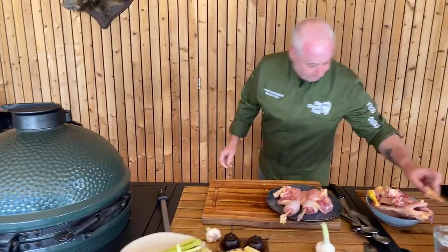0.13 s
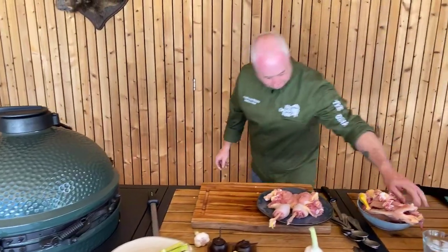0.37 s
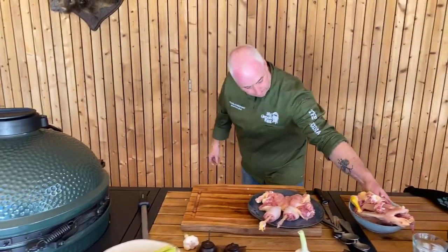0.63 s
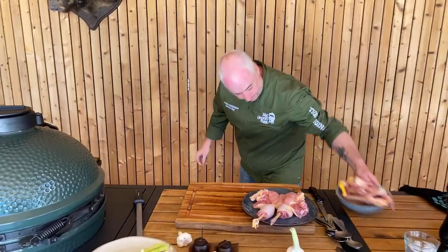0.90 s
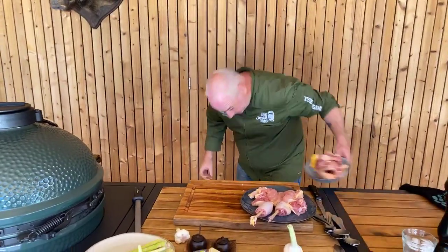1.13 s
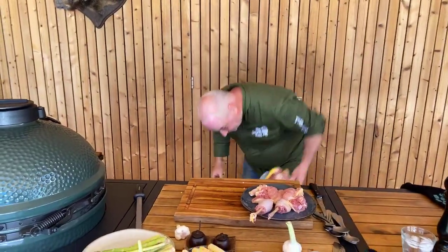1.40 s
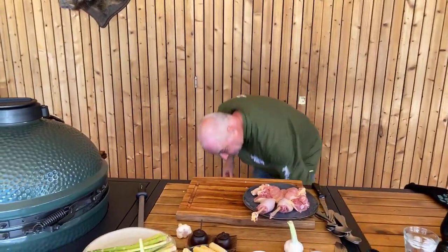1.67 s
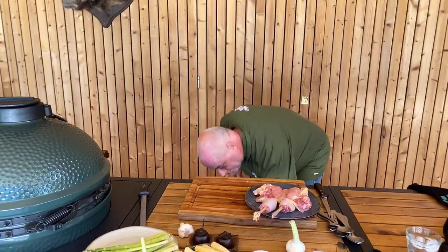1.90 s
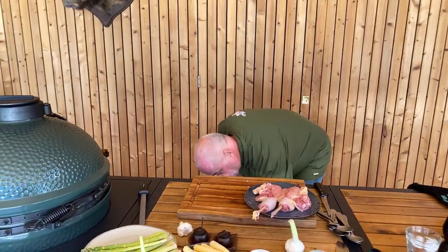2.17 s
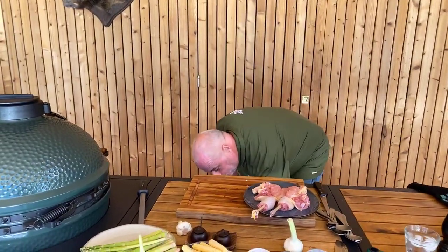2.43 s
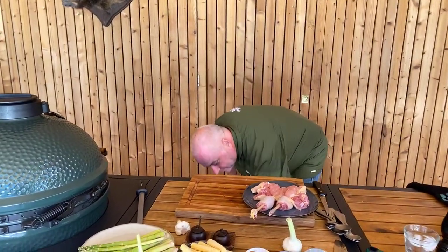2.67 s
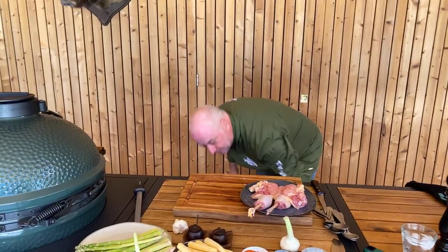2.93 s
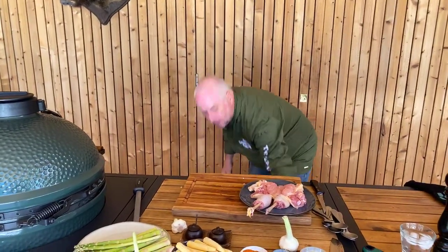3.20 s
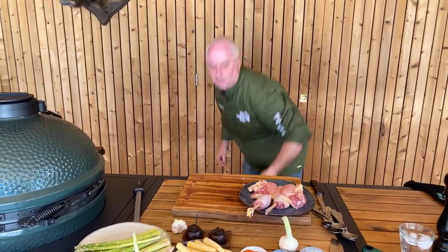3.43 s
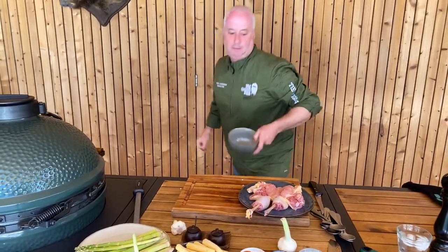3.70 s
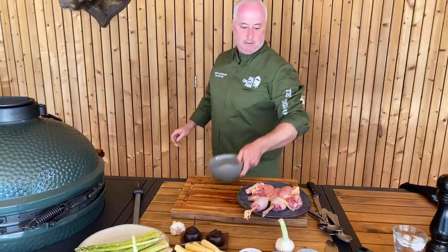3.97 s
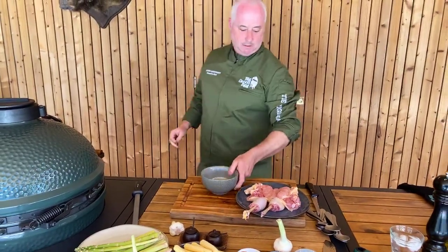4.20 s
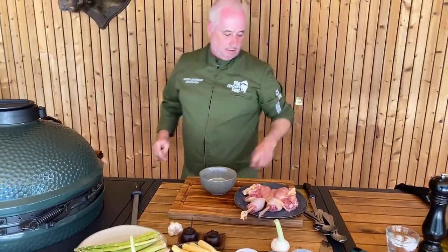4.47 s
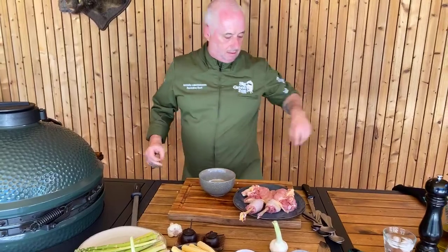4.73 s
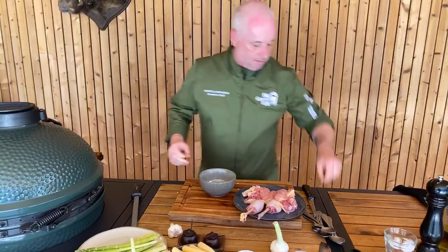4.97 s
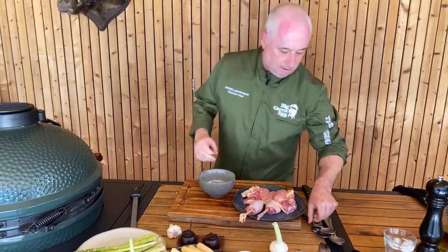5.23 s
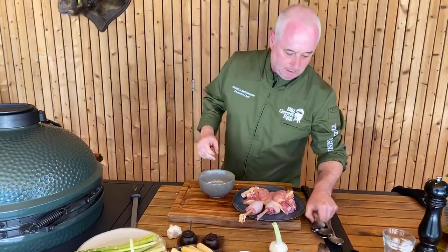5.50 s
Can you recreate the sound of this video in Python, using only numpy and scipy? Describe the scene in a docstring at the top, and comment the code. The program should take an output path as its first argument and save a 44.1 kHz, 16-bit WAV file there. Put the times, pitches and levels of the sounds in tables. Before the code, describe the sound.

A dish scrapes off a wooden table, crashes on a metal shelf, then a small bowl knocks hard on a board and steel tongs clink.

```python
"""At a wooden counter under an open timber shelter, crockery is handled over a distant traffic hum.
A dish is slid off the table by stick and slip and set on a metal shelf, whose crowded modes crash;
a small bowl is lifted out and knocks on a cutting board, and steel tongs clink, all as struck modes.
Sleeves and hands rustle throughout as flickering, shaped noise."""
import sys
import numpy as np
from scipy import signal
from scipy.fft import rfft, irfft
from scipy.io import wavfile
from scipy.ndimage import uniform_filter1d

SR = 44100
rng = np.random.default_rng(int(sys.argv[2]) if len(sys.argv) > 2 else 0)


def pcm_store(signal):
    """Save signal as 16-bit PCM."""
    levels = np.round(np.clip(np.atleast_2d(signal), -1, 1) * 32767)
    wavfile.write(sys.argv[1], SR, levels.astype(np.int16).T)


def gain_from_db(level_db):
    """Turn a decibel level (scalar or array-like) into a linear amplitude factor."""
    decades = np.asarray(level_db, float) / 20
    return 10 ** decades


N = 247842  # length in samples

# Modes of the small bowl. Each row: frequency in Hz, level in dB, t60 in seconds.
BOWL = [(1222, 0, .7), (3106, -3, .06), (4840, 0, .16), (7817, -1, .2), (11920, -8, .05), (15020, -7, .1)]
# Tugs of crockery dragged on its foot. Each row: peak time in seconds, level in dB, rise and fall in seconds.
DISH_TUGS = [(.71, -50.5, 0.023, .1), (.776, -40.5, 0.065, 0.05), (.814, -38, 0.049, .04),
             (.868, -40.5, .04, 0.045), (.908, -37.5, 0.066, 0.042), (.962, -38, 0.049, 0.03)]
BOWL_TUGS = [(3.084, -63.5, .025, .25), (3.162, -59, 0.016, .03), (3.192, -63, .015, 0.027),
             (3.243, -58, 0.013, 0.025)]


def evened(x):
    """Scales to rms 1."""
    return x / np.sqrt(np.mean(x ** 2) + 1e-20)


def read(points, hz):
    """Reads a curve on a log-frequency axis."""
    f, value = np.transpose(points)
    return np.interp(np.log(hz + 1), np.log(f + 1), value)


def add(mix, s, sound):
    """Mixes a sound in at s seconds."""
    part = mix[round(s * SR):][:len(sound)]
    part += sound[:len(part)]


def noise(field_db, size):
    """Noise from random short-time spectra under a level field_db(hz column, t row)."""
    hop = size // 4
    t = np.arange(N // hop + 5) * hop / SR
    hz = np.fft.rfftfreq(size, 1 / SR)[:, None]
    real, imag = rng.standard_normal((len(t), len(hz), 2)).T
    spectra = (real + 1j * imag) * gain_from_db(field_db(hz, t))
    return signal.istft(spectra, nperseg=size, noverlap=size - hop)[1][:N]


def ring(modes, favoured_hz=None):
    """Impulse response of a struck body, peak 1; a striking point lifts the modes near the one it favours."""
    hz, db, t60 = np.transpose(modes)[:, :, None]
    t = np.arange(SR // 2 + SR // 4) / SR
    if favoured_hz:
        lift_db = 9 * np.exp(-(np.log2(hz / favoured_hz) / .35) ** 2)
        db = db + lift_db + 2.5 * rng.standard_normal(db.shape)
    out = (gain_from_db(db - 60 * t / t60) * np.sin(2 * np.pi * hz * t)).sum(0)
    return out / abs(out).max()


def soften(x, hardness_hz):
    """A softer contact lasts longer and loses its treble: two equal low-pass poles."""
    pole = np.exp(-2 * np.pi * hardness_hz / SR)
    return signal.lfilter([(1 - pole) ** 2], [1, -2 * pole, pole ** 2], x)


def crack(t60):
    """The short broadband snap of a contact, without bass."""
    t = np.arange(SR // 8) / SR
    return signal.lfilter([1, -1], [1, -.9], rng.standard_normal(len(t))) * gain_from_db(-60 * t / t60)


def dying(x, t60_points, colour=((1, 0), (2, 0))):
    """Colours x and lets each band die at its own speed; energy 1."""
    hz, t, z = signal.stft(x, SR, nperseg=128)
    level_db = read(colour, hz)[:, None] - 60 * t / read(t60_points, hz)[:, None]
    tail = signal.istft(z * gain_from_db(level_db), SR, nperseg=128)[1]
    return tail / np.linalg.norm(tail)


def swell(t, s, db, rise_s, fall_s, hold_s=0):
    """Power of one gesture: up 20 dB in rise_s, held, down 20 dB in fall_s."""
    up = (s - t) / max(rise_s, .002)
    down = (t - s - max(hold_s, 0)) / max(fall_s, .002)
    return gain_from_db(db - 20 * np.clip(np.maximum(up, down), 0, 6)) ** 2


def taps(rows, modes, crack_db, crack_t60):
    """Light blows that ring one body over a snap."""
    out = np.zeros(N)
    for s, db, hardness_hz, favoured_hz in rows:
        sound = ring(modes, favoured_hz)
        add(sound, 0, gain_from_db(crack_db) * crack(crack_t60))
        sound = soften(soften(sound, hardness_hz), 2 * hardness_hz)
        add(out, s, gain_from_db(db) * sound / abs(sound).max())
    return out


def slide(tugs, modes, slips_per_s, grit_db):
    """Stick and slip: uneven clicks ring now this mode, now that, as the contact wanders; raw grit lies on top."""
    start = round(tugs[0][0], 1) - .1
    t = start + np.arange(SR * 3 // 4) / SR
    slips = (rng.random(len(t)) < slips_per_s / SR) * rng.standard_normal(len(t))
    slips *= gain_from_db(2.5 * np.minimum(rng.exponential(1, len(t)), 4))  # some slips are stronger
    force = evened(slips) * np.sqrt(sum(swell(t, *tug) for tug in tugs))
    grit = soften(crack(0.0044), 5200)
    sound = gain_from_db(grit_db) * signal.oaconvolve(force, grit / np.linalg.norm(grit))[:len(t)]
    for mode in modes:
        wander_db = 5 * evened(uniform_filter1d(rng.standard_normal(len(t)), SR // 30))
        body = ring([mode])[:SR // 4]
        push = force * gain_from_db(mode[1] - 14 + wander_db)
        sound += signal.oaconvolve(push, body / np.linalg.norm(body))[:len(t)]
    out = np.zeros(N)
    add(out, start, soften(sound, 6500))
    return out


def knocks():
    """Crockery knocks on wood: the board thuds at every bounce; a snap and the bowl's ring lie on top."""
    # Blows with their small bounces. Each row: start in seconds, thud level in dB, hardness in Hz,
    # snap level in dB, level of the bowl's ring in dB.
    blows = [(0.2958, -33, 1190, -42, -80), (1.0596, -21, 900, -32, -80), (1.0640, -28, 900, -52, -80),
             (1.0770, -27.5, 900, -42.5, -80), (1.1150, -31, 900, -41, -80), (3.7100, -39, 700, -66, -80),
             (4.029, 2, 1320, -32, -50), (4.0337, -4.5, 2200, -11, -41), (4.0394, -5.5, 1190, -25.5, -50),
             (4.0471, -14, 900, -20, -55), (4.081, -24, 1110, -25.5, -55), (4.1050, -33, 1000, -46, -55),
             (4.135, -5, 1630, -37.5, -32.5), (4.1399, -10, 1900, -31, -41),
             (4.1520, -16.5, 1000, -34, -50)]
    # Modes of the wooden board. Each row: frequency in Hz, level in dB, t60 in seconds.
    board_modes = [(70, 2, 0.013), (151, -1.5, 0.024), (251.5, -11.5, 0.18), (317, -4.5, 0.059),
                   (428, 0.5, 0.05), (493, -14, 0.066), (589, -5, 0.064), (779, -4.5, 0.054),
                   (810, -10, 0.039), (864, -9, 0.03), (900, 14.5, 0.0092), (984, -11, 0.027),
                   (1036, -14, 0.02), (1474, -5, 0.032), (1575, -15, 0.03), (1900, -9.5, 0.014),
                   (2200, -8.5, 0.0097), (2530, -15.5, 0.026)]
    out = np.zeros(N)
    bowl_ring = soften(ring(BOWL), 880)
    board = ring(board_modes)
    settling = 1 - np.exp(-np.arange(len(board)) / SR / 0.0019)  # swells as the foot settles
    board = -np.diff(board * settling)
    for s, thud_db, hardness_hz, snap_db, bowl_db in blows:
        thud = soften(board, hardness_hz)
        add(out, s, gain_from_db(thud_db) * thud / abs(thud).max())
        add(out, s, gain_from_db(snap_db) * soften(soften(crack(0.072), 3640), 11400))
        add(out, s, gain_from_db(bowl_db) * bowl_ring / abs(bowl_ring).max())
    return out


def shelf():
    """Bursts of chatter drive a metal sheet whose modes crowd into noise, and a few clear modes."""
    # The dish lands and chatters. Each row: start in seconds, level in dB, chatter decay in seconds, hardness in Hz.
    crashes = [(2.0073, -6, 0.0046, 13800), (2.018, -8, 0.0059, 13200), (2.062, -15, 0.013, 9000),
               (2.143, -20, 0.013, 9000), (2.231, -14.5, 0.0068, 9000), (2.262, -22.5, 0.012, 11300)]
    # Spectrum of the sheet's dense modes. Each row: frequency in Hz, level in dB.
    sheet_colour = [(71, -46), (120, -8.5), (295, -1.5), (643, -10.5), (968, -3), (1520, -7), (2150, -2),
                    (2480, -5), (2990, -4.5), (5520, -3), (13600, -16), (16000, -26)]
    # Decay of the dense modes. Each row: frequency in Hz, t60 in seconds.
    sheet_t60 = [(200, 0.67), (1000, 0.6), (3000, 0.47), (6000, 0.35), (10000, 0.24), (16000, 0.096)]
    # Modes that stand out. Each row: frequency in Hz, level in dB, t60 in seconds.
    clear_modes = [(248, -13, .6), (2218, -10, .2), (2654, -12, .6), (3063, -9, .3), (3741, -15, .6),
                   (4968, -8, .3), (5405, -9, .3), (5495, -9, .25), (5658, -16, .7), (6874, -6, .18)]
    out, t = np.zeros(N), np.arange(SR // 2) / SR
    lines = ring(clear_modes)
    for s, db, length_s, hardness_hz in crashes:
        body = gain_from_db(-9.0) * lines / np.linalg.norm(lines)
        # a fresh noise tail for each crash
        add(body, 0, dying(rng.standard_normal(len(lines)), sheet_t60, sheet_colour))
        chatter = rng.standard_normal(len(t)) ** 3 * np.exp(-t / max(length_s, .001))
        spread = rfft(chatter)
        chatter = irfft(spread / abs(spread) ** .75, len(t))  # many contact points leave no band favoured
        chatter *= np.exp(-t / (4 * length_s + .004))
        sound = signal.fftconvolve(soften(chatter, hardness_hz), body)
        loudest = np.sqrt(uniform_filter1d(sound ** 2, 800).max())
        add(out, s, gain_from_db(db) * sound / (3 * loudest))
    thin_sheet = signal.butter(2, 190, "high", fs=SR, output="sos")  # radiates no bass
    return signal.sosfilt(thin_sheet, out)


def dish():
    """The dish rings under light blows, and in stick and slip as it is dragged."""
    # Modes of the dish. Each row: frequency in Hz, level in dB, t60 in seconds.
    dish_modes = [(680, 0, .05), (2450, -2, .025), (3330, -3, .025), (3830, -4, .08), (4600, 0, .04),
                  (4840, 0, .045), (5250, -4, .06), (5800, -5, .03), (6826, -7, .03), (7600, -9, .03),
                  (9300, -11, .03)]
    # Light blows. Each row: start in seconds, level in dB, hardness in Hz, favoured mode in Hz.
    dish_blows = [(.2039, -41, 4500, 4400), (.2703, -48, 6000, 5800), (.2972, -56.5, 8200, 4340),
                  (.7950, -34.5, 3000, 700), (.9050, -33, 5000, 2580), (1.0593, -20.5, 8200, 5000)]
    struck = taps(dish_blows, dish_modes, crack_db=-13, crack_t60=0.1)
    return struck + slide(DISH_TUGS, dish_modes, slips_per_s=1200, grit_db=-7.5)


def bowl():
    """The bowl chinks and scrapes as it is lifted out, ringing without its lowest mode."""
    # Light blows. Each row: start in seconds, level in dB, hardness in Hz, favoured mode in Hz.
    bowl_blows = [(3.0400, -55, 12000, 11000), (3.1510, -38.5, 9000, 7400), (3.1630, -39, 12000, 9000),
                  (3.1890, -35.5, 7000, 3100), (3.2390, -40.5, 9000, 4800)]
    struck = taps(bowl_blows, BOWL[1:], crack_db=0, crack_t60=0.026)
    return struck + slide(BOWL_TUGS, BOWL[1:], slips_per_s=890, grit_db=-3)


def tongs():
    """Hard contacts ring the bright modes of steel tongs."""
    # Clinks. Each row: start in seconds, level in dB, hardness in Hz, favoured mode in Hz.
    clinks = [(5.2988, -30, 13800, 9500), (5.3908, -21, 14000, 11000), (5.4143, -16, 14000, 9000),
              (5.4371, -19.5, 14000, 9350), (5.4780, -28.5, 14000, 15000)]
    # Modes of the tongs. Each row: frequency in Hz, level in dB, t60 in seconds.
    steel_modes = [(578, 3, 0.042), (2200, -4, 0.057), (3360, -14, 0.046), (3720, -14, .05),
                   (4670, 6, 0.073), (5500, -9, .05), (6300, 1, 0.14), (8530, 4, 0.053), (9000, 4, 0.047),
                   (9700, 1.5, 0.033), (10500, -1.5, 0.048), (10990, 4, 0.035), (12700, -4, .03),
                   (13400, -7.5, .05), (14500, -1, .08), (15200, -4, 0.11)]
    return taps(clinks, steel_modes, crack_db=-8, crack_t60=0.052)


def rubs():
    """Friction: grainy hiss of cloth and skin, with a duller scrape where weight bears on the wood."""
    # Spectrum of the hiss. Each row: frequency in Hz, level in dB.
    cloth = [(880, -29), (1500, -15.5), (2080, -4.5), (2560, -7), (5540, -11.5), (8660, -19.5),
             (13100, -25), (16000, -33.5)]
    # Spectrum of the scrape on the wood. Each row: frequency in Hz, level in dB.
    wood_rumble = [(40, -39), (120, -10.5), (250, 4.5), (700, 1), (1400, 2), (2800, -29.5), (6000, -58.5)]
    # Sleeves, hands and tools brush past. Each row: peak time in seconds, level in dB, rise, hold and fall
    # in seconds, brightness in dB per octave.
    rustles = [(.222, -57, .012, 0.0064, .05, 4), (0.302, -49.5, .06, 0.018, 0.054, -1.5),
               (0.497, -57.5, 0.17, 0.056, 0.28, -1), (1.276, -52.5, .05, 0.043, 0.074, 1),
               (2.938, -57, .012, 0, .025, .3), (3.56, -62, 0.32, 0, 0.3, 1),
               (4.265, -48, 0.022, 0.057, 0.07, 2), (5.134, -51.5, 0.16, 0.16, 0.26, -1.5),
               (5.302, -43.5, .008, 0.0012, 0.026, .3), (5.398, -41, .013, 0.024, .18, 3.5)]
    # Faint shuffling that never quite stops. Each row: time in seconds, level in dB.
    shuffle = [(0, -71.5), (.25, -63.5), (.7, -60), (1.1, -60.5), (1.5, -61), (2.0, -65), (2.9, -66),
               (3.3, -62.5), (3.8, -66), (4.2, -62), (4.55, -62.5), (4.75, -67), (5.05, -67), (5.62, -60)]
    # Hiss of the dragged crockery. One row: level over the tug in dB, brightness in dB per octave,
    # weight on the wood in dB.
    dish_hiss = (-4, -1.4, -1)
    bowl_hiss = (7.6, 0.2, 5.3)

    def field_db(hz, t):
        """Every gesture adds hiss tilted about 5 kHz plus the scrape, flickering from moment to moment."""
        scrape = gain_from_db(read(wood_rumble, hz))
        scrape = scrape / np.linalg.norm(scrape)

        def colour(tilt_db, weight_db):
            """Power spectrum of one kind of rubbing."""
            hiss = gain_from_db(read(cloth, hz) + tilt_db * np.log2((hz + 1) / 5000)) * (hz > 1200)
            band = np.linalg.norm(hiss * (hz > 2500) * (hz < 9000))
            return (hiss / band + gain_from_db(weight_db) * scrape) ** 2

        power = colour(-0.5, 5.5) * gain_from_db(np.interp(t, *np.transpose(shuffle))) ** 2
        for s, db, rise_s, hold_s, fall_s, tilt_db in rustles:
            power += colour(tilt_db, -4) * swell(t, s, db, rise_s, fall_s, hold_s)
        for tugs, (over_db, tilt_db, weight_db) in ((DISH_TUGS, dish_hiss), (BOWL_TUGS, bowl_hiss)):
            for s, db, rise_s, fall_s in tugs:
                lingering_s = 1.72 * fall_s  # the hiss falls slower than the tug
                power += colour(tilt_db, weight_db) * swell(t, s, db + over_db, rise_s, lingering_s)
        grain = uniform_filter1d(rng.standard_normal((len(t), len(hz))), 20, 0)
        patches = evened(uniform_filter1d(grain, 4, 1)).T
        flicker_db = 0.5 * np.minimum(rng.exponential(1, len(t)), 5)
        return 10 * np.log10(power) + flicker_db + 2.5 * patches

    return noise(field_db, size=256)


def hum():
    """Far traffic and microphone hiss: shaped noise in slowly drifting patches."""
    # Spectrum of the hum. Each row: frequency in Hz, level in dB.
    hum_colour = [(12, -54.5), (20, -18), (81, -2.5), (270, -10), (357, -7), (399, -11), (780, -9),
                  (1000, -8.5), (1090, -8.5), (1440, -12), (1660, -13), (3070, -28), (4420, -39),
                  (16000, -40)]
    # Slow change of level. Each row: time in seconds, relative level in dB.
    hum_swell = [(0.0, 3), (5.62, 0.5)]

    def field_db(hz, t):
        """Spectrum, slow swell and patches."""
        grain = uniform_filter1d(rng.standard_normal((len(t), len(hz))), 10, 0)
        patches_db = evened(uniform_filter1d(grain, 12, 1)).T
        return read(hum_colour, hz) + np.interp(t, *np.transpose(hum_swell)) + patches_db

    return gain_from_db(-49.5) * evened(noise(field_db, size=1024))


def shelter(x):
    """Sparse echoes of random sign off the timber walls, each band dying at its own speed."""
    # Decay of the echoes. Each row: frequency in Hz, t60 in seconds.
    shelter_t60 = [(200, 0.54), (700, 0.39), (2000, 0.47), (5000, 0.28), (12000, 0.34)]
    echoes = np.zeros(SR)
    at = np.arange(200, SR - 20, 20)  # samples: one echo in every 20
    echoes[at + rng.integers(0, 20, len(at))] = rng.choice([-1., 1.], len(at))
    return signal.oaconvolve(x, dying(echoes, shelter_t60))[:N]


def scene():
    """Blows near the microphone with their echoes, the shelf below the counter, rustle and hum."""
    board = knocks()
    below = shelf()
    ware = dish() + bowl() + tongs()
    echoes = gain_from_db(-8.5) * shelter(board) + gain_from_db(-4.5) * shelter(ware) + gain_from_db(-12) * shelter(below)
    return (board + ware + below + echoes + rubs() + hum())[None]


def roll_off(x):
    """The treble ends steeply here."""
    return signal.sosfilt(signal.butter(12, 16480, fs=SR, output="sos"), x)


def record(dry):
    """The microphone drops the deepest bass, the loudest peaks clip flat, and the top treble is cut."""
    mix = signal.sosfilt(signal.butter(2, 48, "high", fs=SR, output="sos"), dry)
    mix = np.clip(mix, -.713, .713)
    band_limit = signal.firwin(511, 15900, window=("kaiser", 9), fs=SR)
    mix = signal.oaconvolve(mix, band_limit[None], "same")
    return roll_off(mix)


dry = scene()
out = record(dry)
pcm_store(out)
```